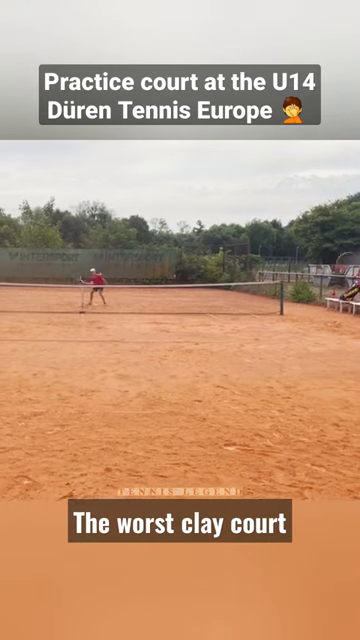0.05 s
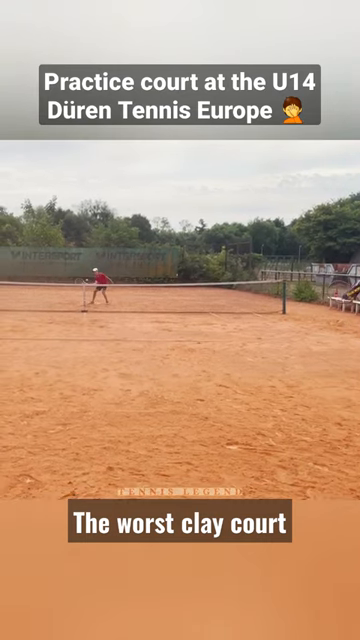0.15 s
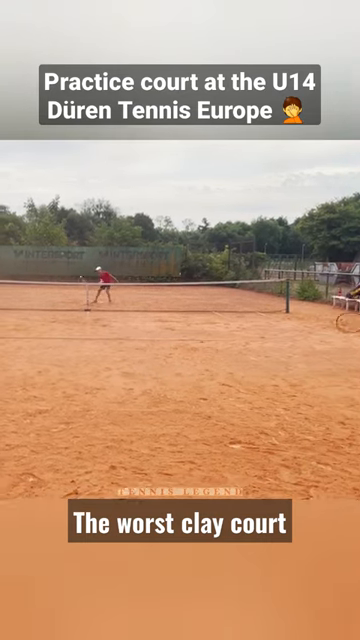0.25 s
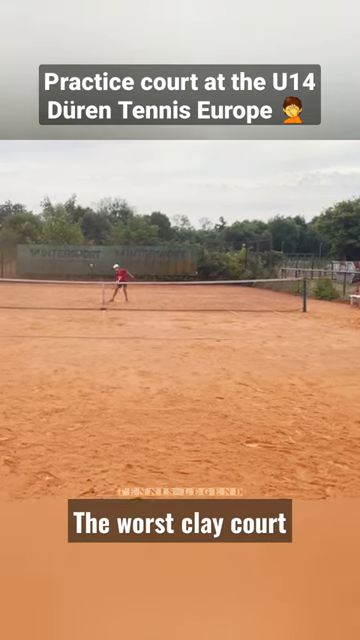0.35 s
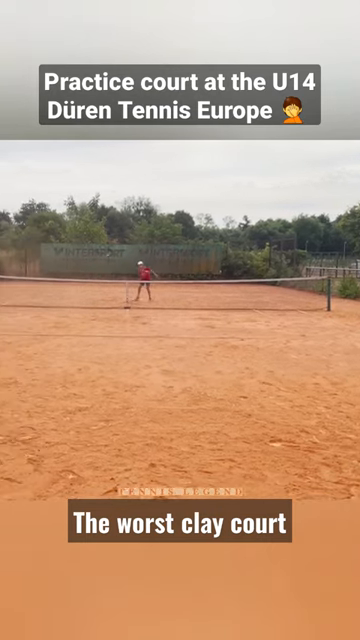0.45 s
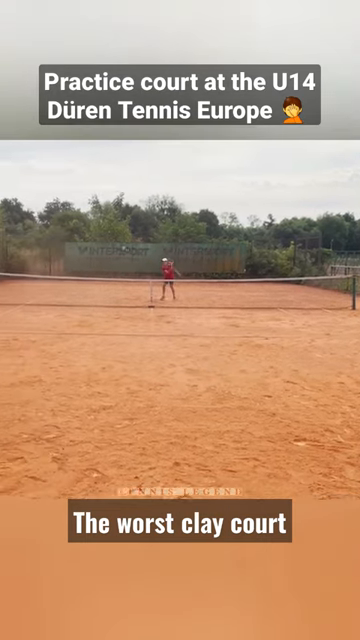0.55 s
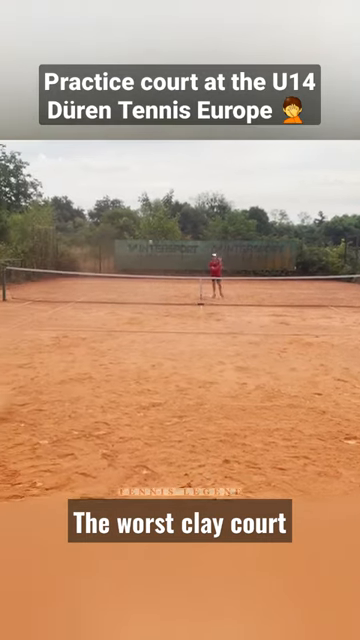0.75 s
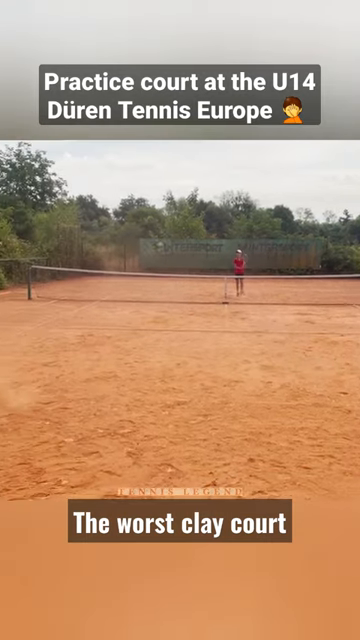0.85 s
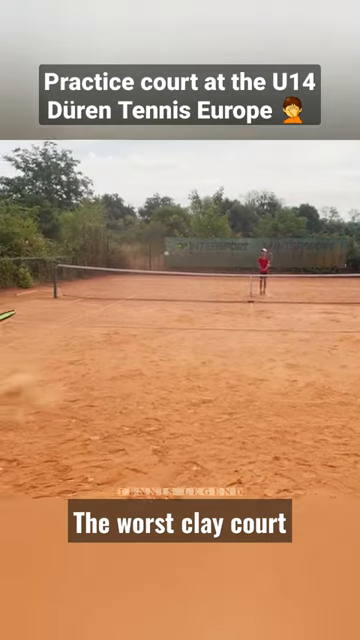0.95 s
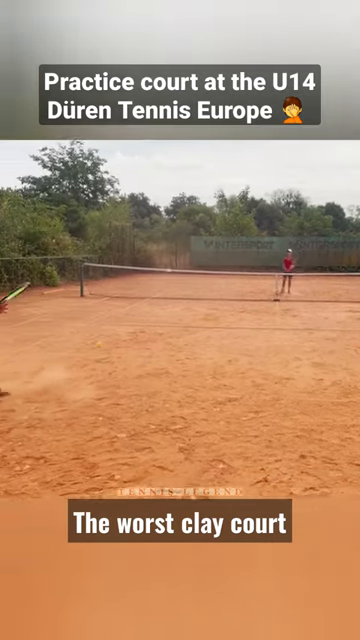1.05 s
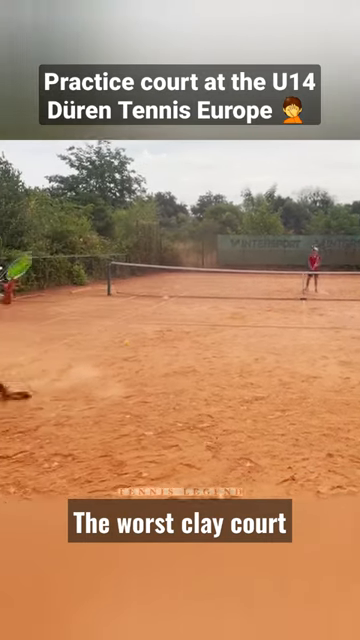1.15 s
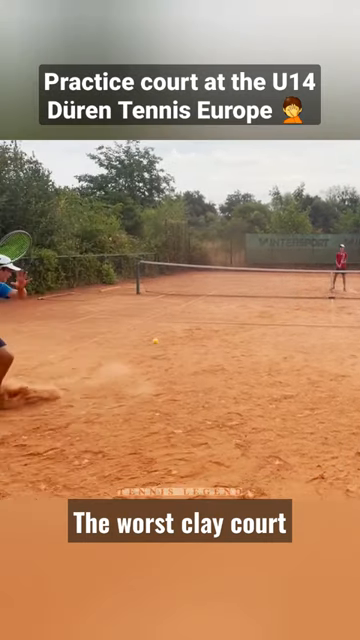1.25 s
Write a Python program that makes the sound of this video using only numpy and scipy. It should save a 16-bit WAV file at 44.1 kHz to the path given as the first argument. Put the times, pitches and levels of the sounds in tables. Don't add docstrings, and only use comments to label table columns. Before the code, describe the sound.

One sharp tennis hit comes early on an open clay court, after a short scuff; then repeated gritty shoe slides, a few pebble ticks and a faint late bird chirp, under low wind noise on a handheld phone.

```python
import sys
import numpy as np
from scipy import signal
from scipy.fft import rfft, irfft, next_fast_len
from scipy.io import wavfile
from scipy.ndimage import map_coordinates

SR = 44100
rng = np.random.default_rng(int(sys.argv[2]) if len(sys.argv) > 2 else 0)


def volts_from_db(level):
    exponent = np.asarray(level, float) / 20
    return 10 ** exponent


def wav_out(sig):
    wavfile.write(sys.argv[1], SR, np.round(np.clip(np.atleast_2d(sig).T, -1, 1) * 32767).astype(np.int16))


N = 57330
TIME = np.arange(N) / SR
BALL_S = .3316


def unit(x):
    return x / np.sqrt(np.mean(x ** 2) + 1e-20)


def noise():
    return rng.standard_normal((2, N))


def along(points, hz):
    f, value = np.transpose(points)
    return np.interp(np.log(hz + 1), np.log(f + 1), value)


def wobble(rate):
    knots = rng.standard_normal(int(N * rate / SR) + 4)
    return map_coordinates(knots, [np.arange(N) * rate / SR])


def filtered(x, response):
    m = next_fast_len(N + SR // 2)
    hz = np.fft.rfftfreq(m, 1 / SR)
    return irfft(rfft(x, m) * response(hz), m)[..., :N]


def colour(spectrum):
    below, above = (spectrum[0][0] / 2, -120), (spectrum[-1][0] * 2, -120)
    closed = [below, *spectrum, above]
    return lambda hz: volts_from_db(along(closed, hz))


def resonance(f, hz, width_hz):
    return 1j * f * width_hz / (hz * hz - f * f + 1j * f * width_hz)


def modes(rows, u):
    total = np.zeros(N)
    for hz, db, t60, sign in rows:
        total += np.sign(sign) * volts_from_db(db - 60 * u / t60) * np.sin(2 * np.pi * hz * u)
    return total


def strokes(rows):
    total = 0
    for s, rise, fall, *db in rows:
        shape = np.exp(-2 * ((TIME - s) / np.where(TIME < s, rise, fall)) ** 2)
        total = total + np.outer(volts_from_db(db), shape)
    return total


# (frequency [Hz], likeness [0-1])
LIKENESS = [(30, .985), (100, .975), (300, .945), (800, .8), (2000, .6), (5000, .7), (7000, .97)]


def stereo(pair, spectrum):
    same_above = (10500, 1)  # (Hz, likeness)

    def response(hz):
        angle = np.arccos(np.clip(along(LIKENESS + [same_above], hz), -1, 1)) / 2
        return colour(spectrum)(hz) * [np.cos(angle), np.sin(angle)]

    mid, side = filtered(pair, response)
    return unit(np.array([mid + side, mid - side]))


# (frequency [Hz], level [dB per Hz])
AIR_TONE = [(300, -1), (600, -5.5), (1000, -5), (2000, -16), (3200, -27.5), (5000, -28.5), (8000, -34.5),
            (12000, -43)]


def open_air():
    start_dip_db = 4.9 * np.exp(-TIME / 0.013)
    air_db = -64 + 0.95 * wobble(8.6) - start_dip_db
    return volts_from_db(air_db) * stereo(noise(), AIR_TONE)


# (time [s], level [dB])
GUSTS = [(0.0, -52), (0.046, -56.5), (0.17, -53.5), (0.188, -59.5), (0.216, -45.5), (0.256, -63),
         (0.386, -49.5), (0.48, -61), (0.516, -52), (0.564, -54), (0.846, -52.5), (1.028, -55), (1.1, -51),
         (1.136, -58.5), (1.212, -49), (1.238, -57), (1.274, -48.5), (1.3, -56)]
# (frequency [Hz], level [dB per Hz])
RUMBLE_TONE = [(18, -29), (30, -13), (48, -3), (65, 2), (119, -4.5), (178, -11.5), (279, -12), (313, -14.5),
               (600, -31), (780, -43), (1320, -120)]


def wind():
    s, db = np.transpose(GUSTS)
    gust_db = np.interp(TIME, s, db) + 2.5 + 0.95 * wobble(13.9)
    hush = open_air()
    return volts_from_db(gust_db) * stereo(noise(), RUMBLE_TONE) + hush


def grains():
    grains_per_s, spread_db = 6000, 1.5
    snaps = rng.random((2, N)) < grains_per_s / SR
    return snaps * noise() * volts_from_db(spread_db * rng.exponential(size=(2, N)))


# (peak [s], rise [s], fall [s], grit level [dB], sole level [dB])
SHOE_STROKES = [(.165, .012, 0.024, -65.5, -59), (.2, 0.025, 0.14, -73, -66), (.29, .05, .03, -72.5, -71),
                (0.427, 0.013, 0.021, -64.5, -62), (0.566, 0.043, 0.029, -62.5, -54.5),
                (.633, 0.0062, 0.045, -68.5, -65), (.72, 0.22, 0.24, -78.5, -77),
                (.785, 0.025, 0.025, -67.5, -56.5), (.83, 0.034, 0.023, -77, -65.5),
                (0.892, 0.022, 0.02, -70, -56.5), (.945, 0.019, 0.019, -73, -57.5),
                (.985, 0.017, 0.03, -72.5, -70), (1.021, .005, 0.03, -63, -57.5),
                (1.07, 0.036, 0.099, -69, -61.5), (1.2, 0.069, 0.13, -73.5, -65.5),
                (1.286, 0.0061, 0.0082, -73, -59)]
# (frequency [Hz], level [dB per Hz])
GRIT_TONE = [(1200, -35), (2500, 4.5), (3300, 1), (5000, 1), (7000, -7.5), (9000, -9), (11500, -35),
             (13000, -38)]
# (frequency [Hz], width [Hz], level [dB])
SOLE_MODES = [(418, 142, 0.5), (798, 189, 3), (1052, 160, -0.5), (1630, 165, -3.5), (2303, 156, -5)]
# (frequency [Hz], level [dB])
PLAIN_TONE = [(40, 0), (16000, 0)]


def scuffs():
    def sole_response(f):
        total = 0
        for k, (hz, width, db) in enumerate(SOLE_MODES):
            total = total + (-1) ** k * volts_from_db(db) * resonance(f, hz, width)
        return total

    grit_level, sole_level = strokes(SHOE_STROKES)
    rubber = stereo(filtered(grains(), sole_response), PLAIN_TONE)
    crackle = stereo(unit(grains()) + 0.55 * noise(), GRIT_TONE)
    return (grit_level * crackle + sole_level * rubber) * volts_from_db([[.8], [-.8]])


# (peak [s], rise [s], fall [s], level [dB])
CLAY_SPRAYS = [
    (.168, 0.013, 0.018, -84),
    (.565, 0.027, 0.041, -81),
    (.785, 0.029, 0.026, -78.5),
    (1.022, .01, .02, -80),
    (1.09, 0.11, 0.18, -80.5),
    (1.295, 0.014, .02, -80),
]
# (frequency [Hz], level [dB per Hz])
DUST_TONE = [(5000, -20), (7500, 1), (10000, -2), (12500, -5), (15000, -16)]


def dust():
    return strokes(CLAY_SPRAYS) * stereo(noise(), DUST_TONE)


# (frequency [Hz], level [dB], 60 dB fade [s], sign)
FRAME_MODES = [(996, -34.5, 0.079, 1), (1030, -45, 0.024, -1), (1389, -28.5, 0.024, 1),
               (1660, -49, 0.024, -1), (1787, -38, 0.043, 1), (2037, -46, 0.13, 1), (2190, -38, 0.055, 1),
               (2595, -49, .04, -1), (2850, -46, .03, 1), (3710, -44, 0.057, 1), (5450, -30, 0.01, 1)]
# (frequency [Hz], level [dB per Hz])
CRACK_TONE = [(800, -20), (1700, 0), (3200, -9), (5300, -3), (6500, -17), (8800, -11), (11500, -25),
              (15500, -30)]


def strings_and_frame():
    strings_s, crack_db, crack_t60_s = .3291, -34.5, .012
    u = np.clip(TIME - strings_s, 0, None)
    frame = modes(FRAME_MODES, u) * (1 - np.exp(-u / 0.0014))
    burst = unit(filtered(rng.standard_normal(N), colour(CRACK_TONE)))
    crack = burst * (1 - np.exp(-u / 0.00015)) * volts_from_db(crack_db - 60 * u / crack_t60_s)
    return frame + crack


# (frequency [Hz], level [dB], 60 dB fade [s], sign)
BALL_MODES = [(763, -5.3, .01, -1), (909, -8.3, .012, 1), (1040, -11.5, .0113, -1)]


def ball():
    squash_s, squash_hz, squash_db = .0076, 323, -23.5
    push_hz, push_db, swell_s = 205, -30, .0055
    ground_s, ground_db = .0051, -13
    u = np.clip(TIME - BALL_S, 0, None)
    contact = np.sin(np.pi * np.clip(u / squash_s, 0, 1))
    squash = volts_from_db(squash_db) * np.sin(2 * np.pi * squash_hz * u)
    push = volts_from_db(push_db) * np.sin(2 * np.pi * push_hz * u)
    ringing = modes(BALL_MODES, u) * (1 - np.exp(-u / swell_s))
    direct = contact * (squash - push) + ringing
    return direct + volts_from_db(ground_db) * np.roll(direct, round(ground_s * SR))


# (frequency [Hz], 60 dB fade [s])
COURT_FADE = [(200, 0.6), (1000, 0.21), (2500, 0.42), (5000, 0.32), (12000, 0.21)]
# (frequency [Hz], level [dB per Hz])
SCATTER_TONE = [(150, 0.5), (350, 0), (550, -11.5), (1000, -2.5), (2000, -10), (4000, -15), (6500, -21),
                (12000, -37)]


def court_tail():
    tail_db = -47
    wash = stereo(noise(), SCATTER_TONE)[:, :SR // 2]
    hz, t, z = signal.stft(wash, SR, nperseg=256)
    fade = volts_from_db(-60 * t / along(COURT_FADE, hz)[:, None])
    tail = signal.istft(z * fade, SR, nperseg=256)[1]
    return volts_from_db(tail_db) * np.pad(tail, ((0, 0), (round(BALL_S * SR), N)))[:, :N]


ECHO_DELAYS = [.0203, .034, .0625, .048, .092, .075, .09, .105]
# (level [dB], frequency [Hz], width [Hz])
ECHO_TONES = [
    (-9.5, 1010, 350),
    (-14, 1010, 150),
    (-20, 290, 200),
    (-8, 3050, 300),
    (-10, 3700, 200),
    (-24, 990, 200),
    (-24, 1020, 200),
    (-29, 960, 200),
]


def echoes(hit):
    right_later_s = np.array([[0], [.00008]])
    total = np.zeros((2, N))
    for s, (db, hz, width) in zip(ECHO_DELAYS, ECHO_TONES):
        def response(f):
            delay = np.exp(-2j * np.pi * f * (s + right_later_s))
            return volts_from_db(db) * resonance(f, hz, width) * delay
        total += filtered(hit, response)
    return total


# (time [s], level [dB])
STONE_KICKS = [
    (.529, -31),
    (.9345, -31),
    (.9432, -38),
    (.9683, -20.5),
    (.9706, -31),
    (.982, -36),
]
# (frequency [Hz], level [dB per Hz])
STONE_TONE = [(600, -12), (1200, 0), (1900, -5), (2700, -3), (3600, -14), (5500, -26), (7000, -40)]


def stones():
    kicks = np.zeros(N)
    for s, db in STONE_KICKS:
        kicks[round(s * SR)] = -volts_from_db(db)
    return filtered(kicks, colour(STONE_TONE)) * volts_from_db([[-1.5], [1.5]])


# (start [s], length [s], from [Hz], to [Hz], level [dB])
BIRD_CALLS = [
    (1.153, .03, 3450, 5050, -70.5),
    (1.274, .018, 4300, 5100, -73),
]


def bird():
    out = np.zeros(N)
    for s, length, from_hz, to_hz, db in BIRD_CALLS:
        u = np.clip((TIME - s) / length, 0, 1)
        cycles = length * (from_hz * u + (to_hz - from_hz) * u ** 2 / 2)
        out += volts_from_db(db) * np.sin(np.pi * u) * np.sin(2 * np.pi * cycles)
    return out


def scene():
    hit = strings_and_frame() + ball()
    court = echoes(hit) + court_tail()
    shoes = scuffs() + dust() + stones()
    return hit + court + shoes + bird() + wind()


def band_limit(x):
    return signal.sosfilt(signal.butter(12, 13540, fs=SR, output="sos"), x)


# (frequency [Hz], left ahead of right [radians])
PORT_TURN = [(1400, 0), (2400, .6), (3800, .1), (4700, 1), (5700, 0), (7500, -2.5), (8900, -3.7),
             (10800, -6.1), (13500, -6.4)]


def record(dry):
    def ports(hz):
        turn = np.outer([.5, -.5], along(PORT_TURN, hz))
        return (hz < 15600) * np.exp(1j * turn)

    return band_limit(filtered(dry, ports))


dry = scene()
out = record(dry)
wav_out(out)
```